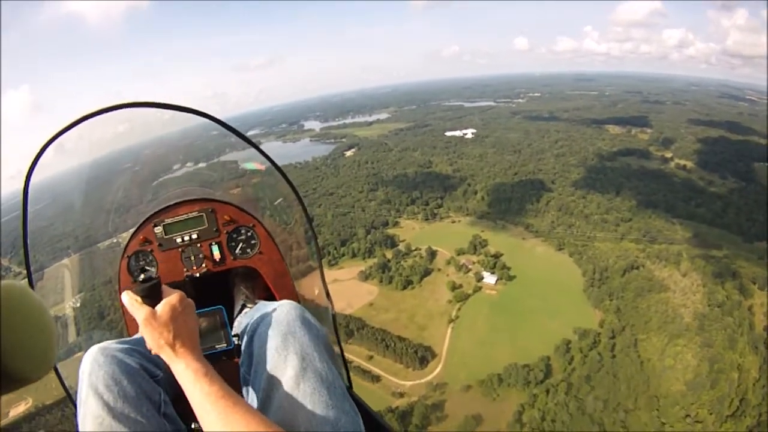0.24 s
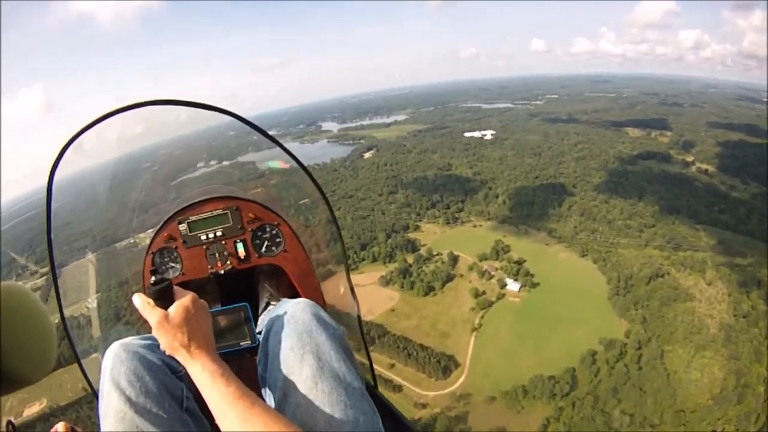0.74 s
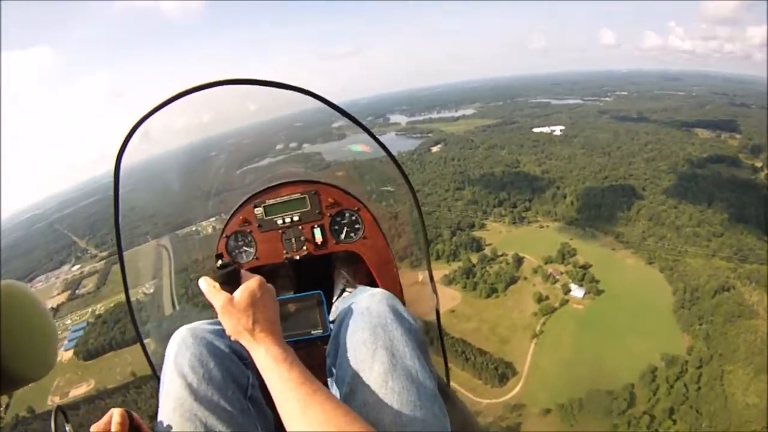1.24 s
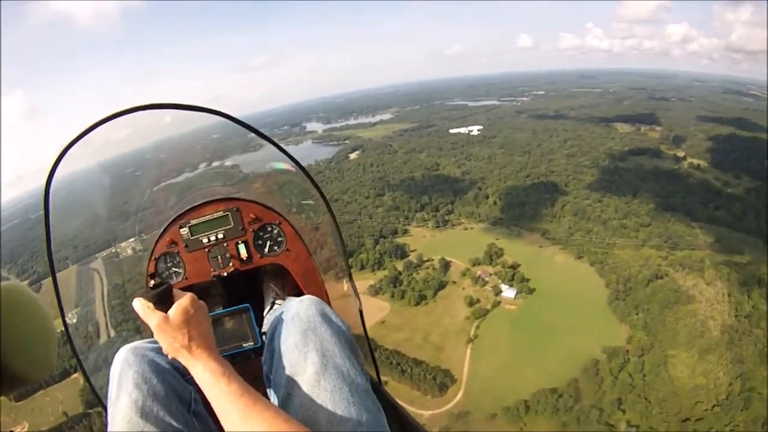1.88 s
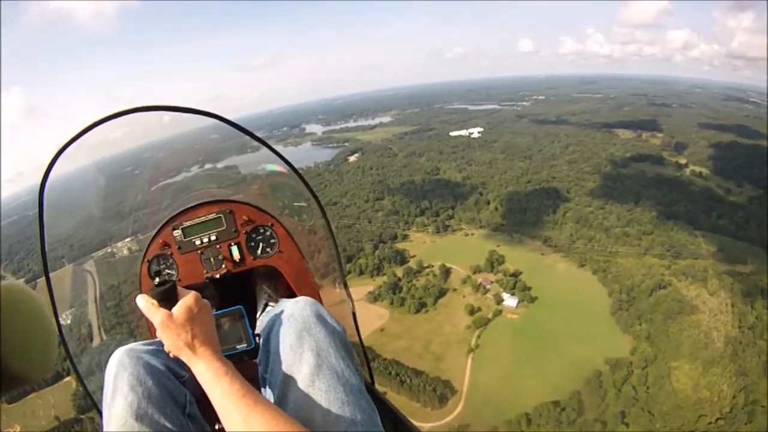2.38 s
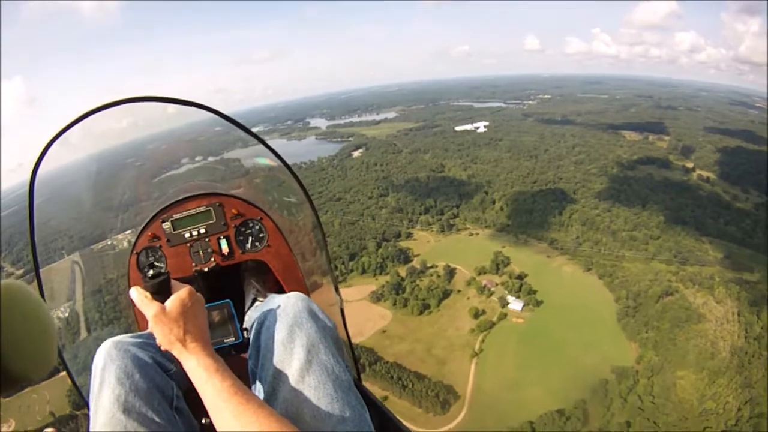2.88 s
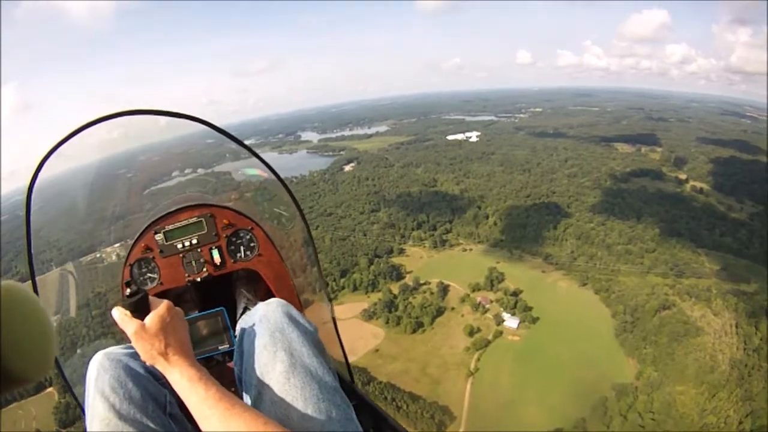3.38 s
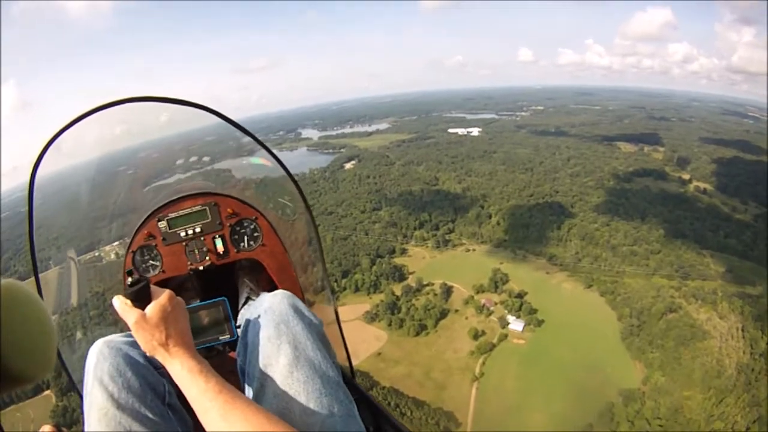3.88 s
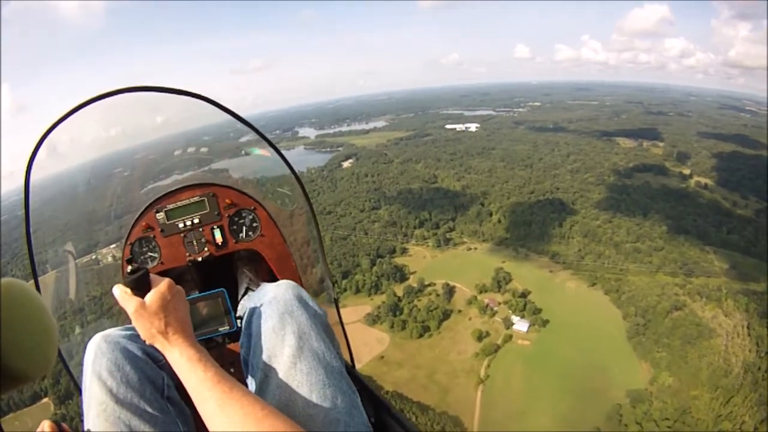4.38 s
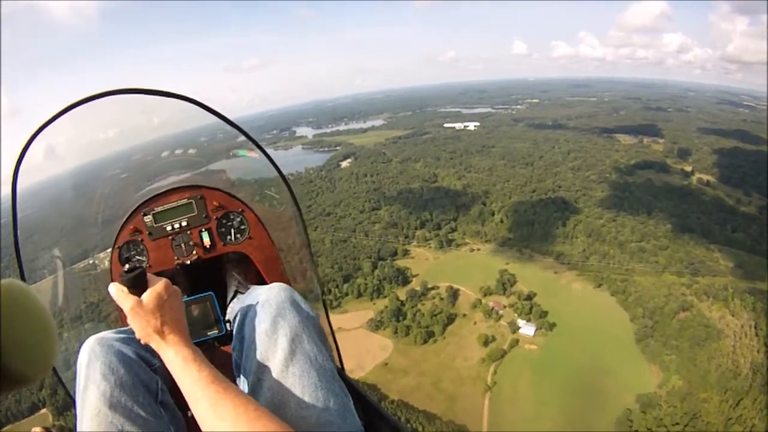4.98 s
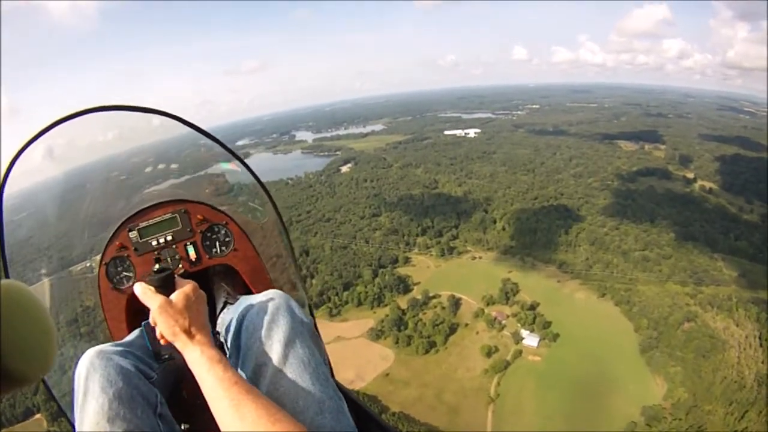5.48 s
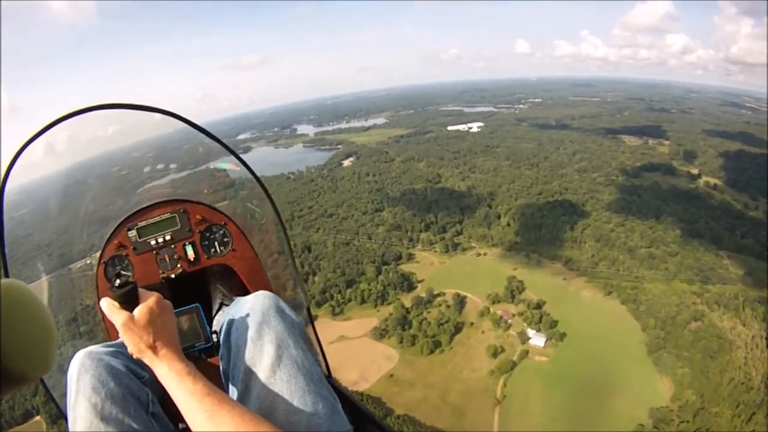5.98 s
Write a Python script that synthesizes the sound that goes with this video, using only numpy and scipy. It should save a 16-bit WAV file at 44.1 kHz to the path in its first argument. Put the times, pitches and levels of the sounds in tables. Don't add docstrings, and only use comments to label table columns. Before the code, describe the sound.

Constant cruising flight: buzzy low exhaust hum and propeller throb, nearly fixed in pitch, sagging only very slightly by the end. Slipstream buffets a microphone sealed in a plastic shell, giving a hollow midrange hiss and low howl. The rush is strongest early, weakens through the middle, and lifts a little near the end, while irregular low thumps bump the housing. Outdoors, high in the air, with no echo.

```python
import sys
import numpy as np
from scipy import signal
from scipy.fft import rfft, irfft, next_fast_len
from scipy.io import wavfile
from scipy.ndimage import uniform_filter1d, map_coordinates

SR = 44100
rng = np.random.default_rng(int(sys.argv[2]) if len(sys.argv) > 2 else 0)


def volts_from_db(level):
    exponent = np.asarray(level, float) / 20
    return 10 ** exponent


def int16_out(signal):
    q = np.round(np.clip(np.atleast_2d(signal).T, -1, 1) * 32767)
    wavfile.write(sys.argv[1], SR, q.astype(np.int16))


N = 275625

# t/s, blade-pass rate/Hz
SPEED = [(0.0, 79.02), (0.3, 79.2), (0.8, 78.82), (1.5, 78.41), (1.9, 78.5), (2.4, 78.29), (2.9, 78.74),
         (3.35, 78.7), (3.85, 78.33), (4.35, 78.44), (4.85, 78.65), (5.4, 78.4), (5.85, 77.98),
         (6.13, 77.66), (6.25, 77.62)]
# f/Hz, level/dB
SHELL = [(500, -25.5), (800, -14.5), (1000, -5), (1250, -2), (1450, 0.5), (1650, -6.5), (1900, -16.5),
         (2300, -47)]
# f/Hz, level/dB
UPPER = [(1500, -31.5), (1900, -7.5), (2150, -2.5), (2500, 0), (3100, 1.5), (3600, -5.5), (4400, -8.5),
         (5200, -16.5), (6600, -17), (8000, -20.5), (10000, -28), (12700, -37), (16000, -48)]
GEAR = 1.1632
HISS_FROM_DB = 2.5
GUST_S = 0.18


def unit(x):
    return x / np.sqrt(np.mean(x ** 2) + 1e-20)


def curve(rows):
    s, value = np.transpose(rows)
    return np.interp(np.arange(N) / SR, s, value)


def swells(rows, half_s):
    t = np.arange(N) / SR
    return sum(db * np.exp(-((t - s) / half_s) ** 2) for s, db in rows)


def wobble(rate_hz):
    knots = rng.standard_normal(int(N * rate_hz / SR) + 4)
    return map_coordinates(knots, [np.arange(N) * rate_hz / SR])


def coloured(x, spectrum):
    m = next_fast_len(N + 8192)
    f, level_db = np.transpose(spectrum)
    hz = np.fft.rfftfreq(m, 1 / SR)
    gain = volts_from_db(np.interp(np.log(hz + 1), np.log(f + 1), level_db, left=-120, right=-120))
    return unit(irfft(rfft(x, m) * gain, m)[:N])


def patchy(depth_db, frames):
    z = signal.stft(rng.standard_normal(N + 512), nperseg=512)[2]
    field = uniform_filter1d(rng.standard_normal(z.shape), size=6, axis=0)
    field = uniform_filter1d(field, size=frames, axis=1)
    return signal.istft(z * volts_from_db(depth_db * unit(field)), nperseg=512)[1][:N]


def tones(orders, angle, drift_db=0, flutter_db=0, spread=0, smear=0):
    out = np.zeros(N)
    for k, level_db in orders:
        gain = volts_from_db(level_db + drift_db * wobble(1.8) + flutter_db * wobble(14))
        phase = spread * rng.normal() + smear * k * k
        out += np.sqrt(2) * gain * np.cos(k * angle + phase)
    return out


def slide(period_s=2.75, peak_s=0.59):
    return np.cos(2 * np.pi * (np.arange(N) / SR - peak_s) / period_s)


def exposure():
    # t/s, wind strength/dB
    wind = [(0, 4), (.3, 5), (.6, 5.5), (.85, 5), (1.05, 2.8), (1.35, 2), (1.95, 1.5), (2.3, 1), (2.8, -2),
            (3.55, 1), (3.9, -4), (4.6, -2), (4.95, -3), (5.4, -5), (5.75, -.5), (6.25, -1)]
    strength_db = curve(wind)
    return strength_db - strength_db.mean()


def shaft():
    rate_hz = curve(SPEED) * (1 + 0.00067 * wobble(12))
    return 2 * np.pi * np.cumsum(rate_hz) / SR


def exhaust(blade):
    # multiple of the crank rate, level/dB rms
    orders = [(1, -54.5), (2, -38.3), (3, -53.7), (4, -52.5), (5, -67.4), (6, -60.8), (7, -80.1),
              (8, -75.1), (9, -70.5), (10, -72.0), (11, -65.7), (12, -76.0), (13, -67.4), (14, -68.4),
              (15, -65.5), (16, -68.0), (17, -72.4), (26, -82.0), (27, -80.0), (28, -78.5)]
    # t/s, level/dB
    facing = [
        (0, -4),
        (.6, -6.5),
        (1.2, -0.5),
        (2.0, -1),
        (2.9, 1),
        (4.4, 1.5),
        (5.6, 1),
        (6.0, 0.5),
        (6.25, -1.5),
    ]
    firing_db = curve(facing)
    crank = GEAR * blade
    port = crank - 0.98
    pipe = 0.095

    firing = -tones(orders[:2], port, flutter_db=0.83, smear=pipe)
    octave = -tones(orders[3:4], port, drift_db=0.8, flutter_db=1.0, smear=pipe)
    body = -tones(orders[2:3] + orders[4:9], port, drift_db=0.3, flutter_db=1.2, smear=pipe)
    buzz = tones(orders[9:], crank, flutter_db=1.5, spread=0.41)

    firing *= volts_from_db(firing_db + 0.14)
    octave *= volts_from_db(4.5 * slide() - 2.5)
    body *= volts_from_db(0.14 + 0.88 * firing_db)
    buzz *= volts_from_db(1.5 * slide() - 0.1)
    return firing + octave + body + buzz


def propeller(blade):
    # multiple of the blade rate, level/dB rms
    orders = [(1, -44.5), (2, -40.3), (4, -47.4), (12, -69.6), (13, -72.4), (17, -69.4), (17.975, -60.8),
              (19, -68.7), (20, -58.9), (23, -76.0), (24, -84.0), (36, -74.5), (37, -74.0), (41, -77.8),
              (42, -80.1), (50, -87.3), (69, -95.2), (75, -93.0), (76, -89.5), (80, -99.0), (82, -90.6),
              (83, -96.7), (84, -92.0), (106, -97.0), (14, -69.5), (25, -83.0), (35, -78.5), (44, -85.0),
              (61, -94.0), (60, -90.0), (62, -90.5), (72, -94.0), (86, -95.0), (87, -96.0), (30, -83.0),
              (39, -80.0), (40, -81.0), (18, -64.5)]
    wind_db = exposure()

    low = tones(orders[:2], blade, drift_db=0.5, flutter_db=0.8)
    low -= tones(orders[2:3], blade, drift_db=0.2, flutter_db=0.5)
    low *= volts_from_db(-0.079 * wind_db - 0.02)

    whine = tones(orders[8:9], blade, drift_db=1.1, flutter_db=1.5, spread=3.5)
    resonance_db = -6 * (curve(SPEED) - 78.38)
    tear_db = 0.31 * np.maximum(wind_db - HISS_FROM_DB, 0) * (2.2 * wobble(6.8) + 1)
    whine *= volts_from_db(resonance_db + slide() + 0.16 + tear_db)

    high = tones(orders[3:6] + orders[7:8] + orders[9:-1], blade, flutter_db=1.0, spread=3.3)
    high *= volts_from_db(0.5 - 0.25 * wind_db)

    mesh = tones(orders[6:7] + orders[-1:], blade, drift_db=5.0, flutter_db=1.0)
    mesh *= volts_from_db(4 * slide(period_s=3.8, peak_s=0.75) - 5.0)
    return low + whine + high + mesh


def blade_slap(blade):
    # f/Hz, level/dB
    air = [(4000, -21), (5200, 6), (6600, 4), (8000, -1), (10000, -10), (13000, -29)]
    passes = np.diff(np.floor(blade / (2 * np.pi)), prepend=0)
    decay = volts_from_db(-60 * np.arange(2500) / SR / 0.09)
    slap = signal.fftconvolve(passes, rng.standard_normal(2500) * decay)[:N]
    return (volts_from_db(-73) * coloured(slap, SHELL)
            + volts_from_db(-79) * coloured(slap, UPPER)
            + volts_from_db(-87) * coloured(slap, air))


def thumps(wind_db):
    # f/Hz, level/dB
    spectrum = [(12, -40), (25, -17), (45, -10), (65, -7.5), (90, -7), (140, -33.5)]
    # t/s, swell/dB
    gusts = [
        (.25, 4),
        (1.1, 2),
        (1.85, 7.5),
        (3.15, 11),
        (3.85, 9.5),
        (4.2, 7),
        (4.55, 4),
        (4.9, 10.5),
        (5.3, 1),
        (6.2, 1.5),
    ]
    level_db = -51.5 - 0.1 * wind_db + swells(gusts, GUST_S) + 0.35 * wobble(4.1)
    return volts_from_db(level_db) * coloured(rng.standard_normal(N), spectrum)


def buffeting(wind_db, gust, eddies):
    # f/Hz, level/dB
    spectrum = [(40, -42.5), (65, -12), (95, -2.5), (140, -2), (195, -1), (222, -7), (330, -12.5),
                (430, -19.5), (700, -33.5)]
    # t/s, swell/dB
    rolls = [
        (.3, 0.5),
        (1.15, 3.5),
        (2.1, 2),
        (2.8, 3.5),
        (3.9, 2),
        (5.35, 3.5),
    ]
    level_db = -39 + 0.24 * wind_db + swells(rolls, half_s=0.28)
    level_db += 0.5 * gust + 0.48 * eddies + 0.82 * wobble(11)
    return volts_from_db(level_db) * coloured(patchy(0.07, frames=8), spectrum)


def howl(wind_db, gust, eddies):
    # f/Hz, level/dB
    spectrum = [(150, -31), (195, -9.5), (212, 1), (235, -6), (270, -8.5), (340, -18), (450, -29.5)]
    level_db = -46 + 1.14 * wind_db + 0.35 * gust + 0.5 * eddies + 0.39 * wobble(2.6)
    return volts_from_db(level_db) * coloured(patchy(1.0, frames=8), spectrum)


def rim_roar(wind_db, gust, eddies, firing):
    # f/Hz, level/dB
    spectrum = [(200, -33.5), (350, 4), (450, -1.5), (560, -7), (700, -12), (900, -17.5), (2000, -37)]
    # t/s, change/dB
    spills = [
        (.05, 2),
        (.93, -2),
        (1.5, 2),
        (5.7, 2),
    ]
    level_db = -50.86 + wind_db + 0.3 * gust + 0.86 * eddies + swells(spills, GUST_S)
    return volts_from_db(level_db) * coloured((1 + 0.1 * firing) * patchy(1.7, frames=8), spectrum)


def shell_hiss(wind_db, gust, eddies, firing):
    shell = coloured((1 + 0.26 * firing) * patchy(1.1, frames=6), SHELL)
    upper = coloured((1 + 0.075 * firing) * patchy(0.8, frames=6), UPPER)
    shell_db = -52 + 0.98 * np.maximum(wind_db - HISS_FROM_DB, 0) + 0.45 * gust + 0.28 * eddies
    upper_db = -61.6 + 0.072 * wind_db + 0.19 * gust + 0.21 * eddies
    upper_db += 0.55 * eddies + 0.45 * wobble(22)
    return volts_from_db(shell_db) * shell + volts_from_db(upper_db) * upper


def rush(wind_db, gust, eddies):
    # f/Hz, level/dB
    spectrum = [(600, -21), (800, 2), (1900, -3.5), (2300, -4.5), (4500, -9.5), (6500, -21), (9000, -27),
                (12700, -36.5)]
    level_db = -69.5 + 1.9 * wind_db + 0.3 * gust + eddies + 0.6 * wobble(18)
    return volts_from_db(level_db) * coloured(rng.standard_normal(N), spectrum)


def slipstream(blade):
    wind_db, gust, eddies = exposure(), wobble(7), wobble(40)
    crank = GEAR * blade
    firing = np.cos(2 * crank) + 0.3 * np.cos(4 * crank) + 0.05 * np.cos(crank)
    out = thumps(wind_db) + buffeting(wind_db, gust, eddies) + howl(wind_db, gust, eddies)
    out += rim_roar(wind_db, gust, eddies, firing) + shell_hiss(wind_db, gust, eddies, firing)
    return out + rush(wind_db, gust, eddies)


def scene():
    blade = shaft()
    return (exhaust(blade) + propeller(blade) + blade_slap(blade) + slipstream(blade))[None]


def low_pass(x):
    return signal.sosfilt(signal.butter(12, 12750, fs=SR, output="sos"), x)


def record(dry):
    bent = dry - 0.75 * (dry ** 2 - np.mean(dry ** 2))
    return low_pass(bent)


dry = scene()
out = record(dry)
int16_out(out)
```